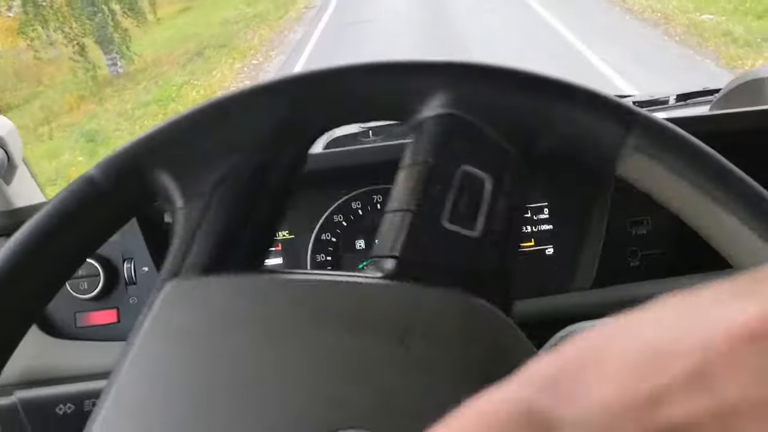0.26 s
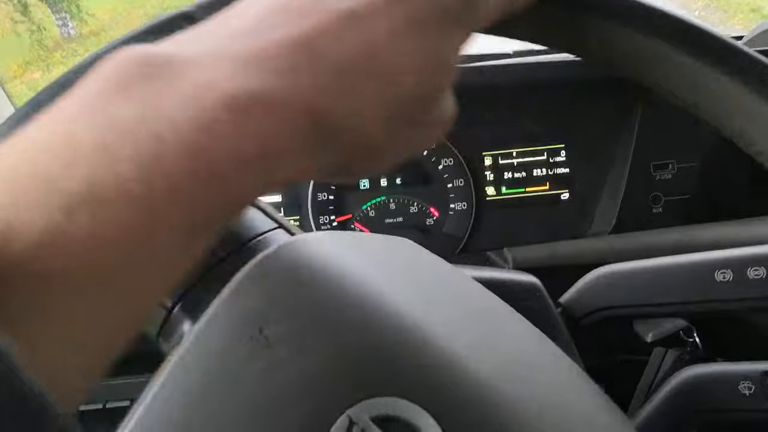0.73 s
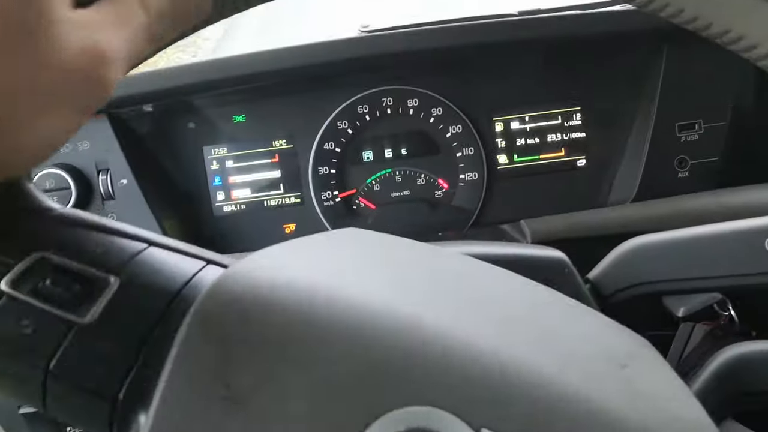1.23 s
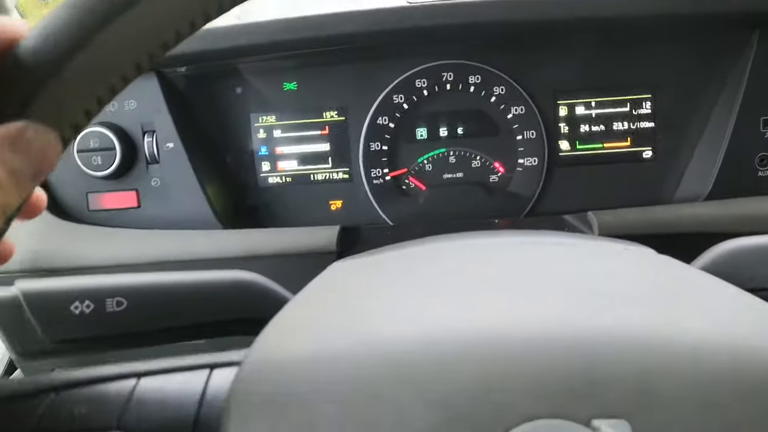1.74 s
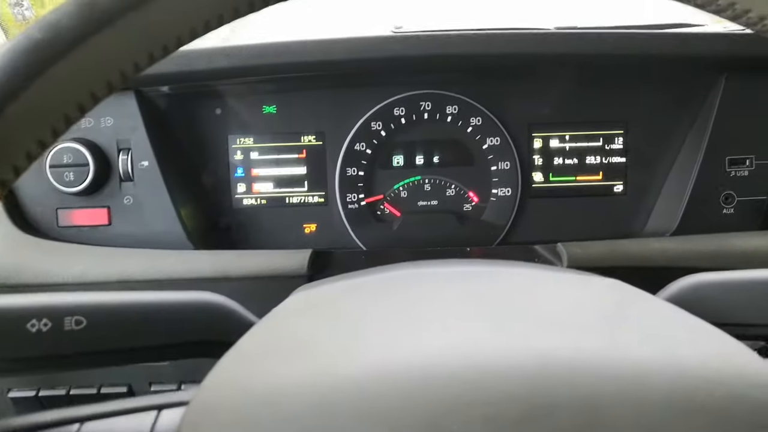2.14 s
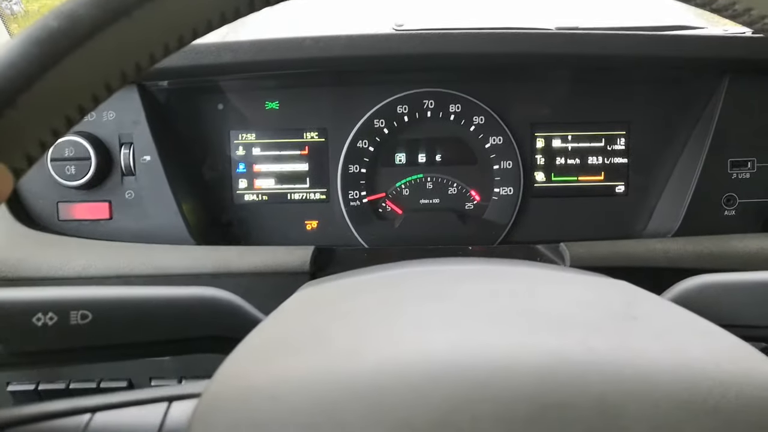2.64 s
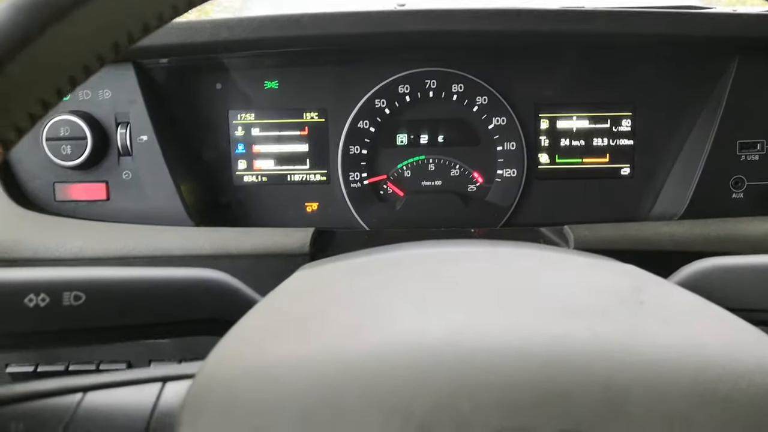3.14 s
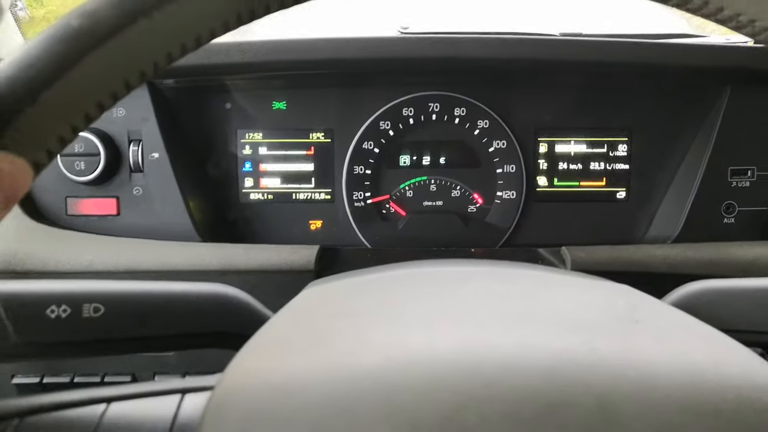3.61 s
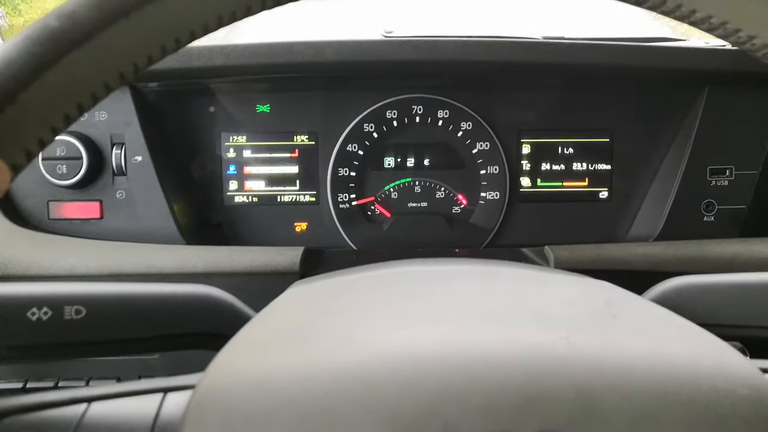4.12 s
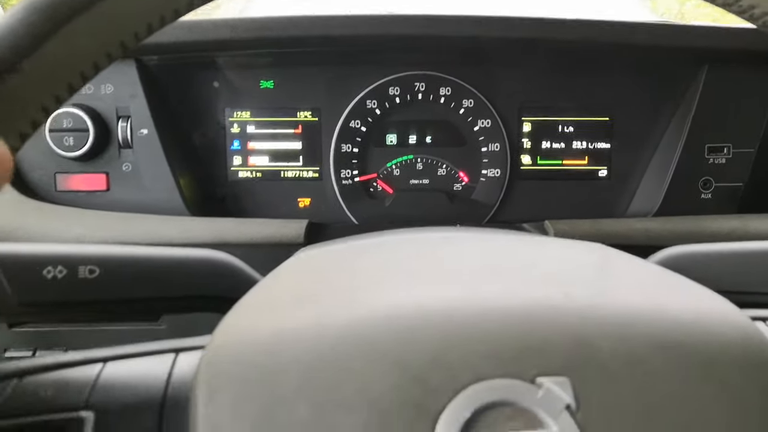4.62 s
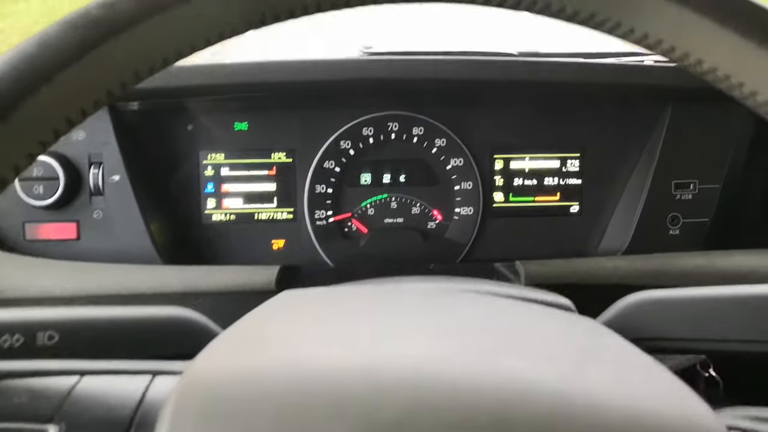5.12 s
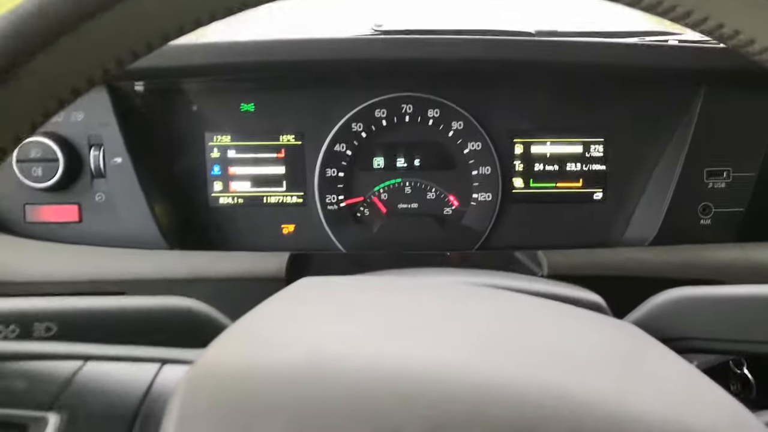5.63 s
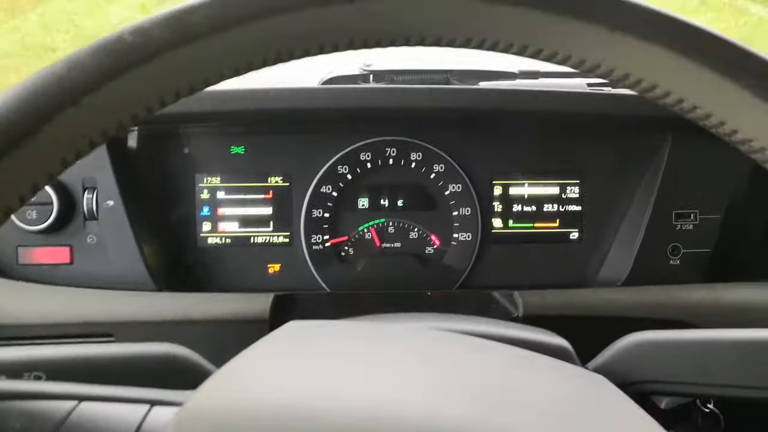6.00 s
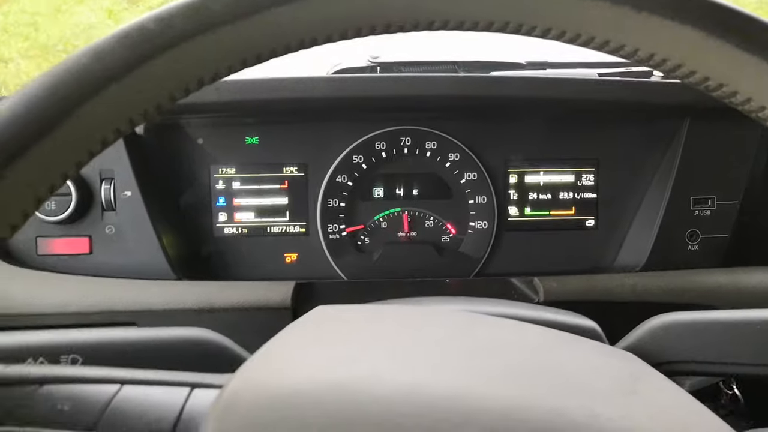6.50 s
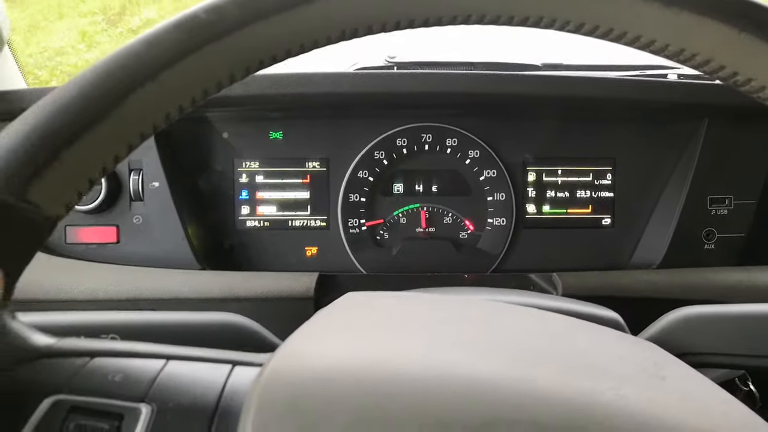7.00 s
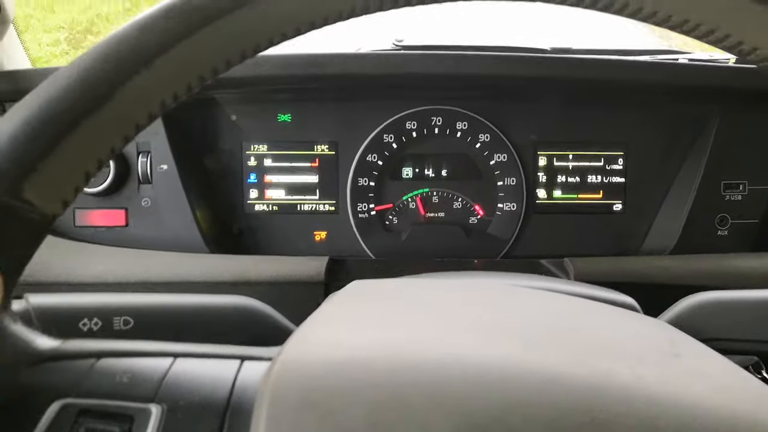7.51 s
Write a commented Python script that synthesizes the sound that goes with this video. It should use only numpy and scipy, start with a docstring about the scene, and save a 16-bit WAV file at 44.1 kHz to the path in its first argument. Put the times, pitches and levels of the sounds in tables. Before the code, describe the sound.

Heard from the driver's seat inside a heavy truck, a diesel engine rumbles at idle with a light clatter. Hands slide faintly over the steering wheel and the cab gives one soft thump. After about five seconds the engine revs up and grows much louder, booming and briefly rattling the trim. A short pop comes at the gear change, the revs drop, and the engine pulls again.

```python
"""A six-cylinder diesel heard inside a heavy truck's cab: it rolls at idle, pulls hard, shifts up, pulls again.
Firing pulses boom and engine orders sweep through the cab's air modes; combustion clatters behind the
bulkhead, gears whine, the intake roars and a metal cover rings at idle. The cab judders and thumps once,
loose trim rattles, hands slide and catch on the wheel, and a pressure pop snaps at the gear change."""
import sys
import numpy as np
from scipy import signal
from scipy.fft import rfft, irfft
from scipy.io import wavfile

SR = 44100
rng = np.random.default_rng(int(sys.argv[2]) if len(sys.argv) > 2 else 0)


def digitize_waveform(pressure):
    """Quantize a signal to 16-bit integers and store it at the path in sys.argv[1].

    Rows of a 2-D input are taken as channels; values are limited to [-1, 1].
    """
    field = np.atleast_2d(pressure).T
    bounded = np.clip(field, -1, 1)
    quanta = np.round(bounded * 32767).astype(np.int16)
    wavfile.write(sys.argv[1], SR, quanta)


N = 341775
T = np.arange(N) / SR
HZ = np.maximum(np.arange(N // 2 + 1) * SR / N, 1)


def undb(db):
    """Decibels to gain."""
    return 10 ** (np.asarray(db) / 20)


def curves(rows):
    """Columns after the first, interpolated linearly over time."""
    times_s, *columns = np.transpose(rows)
    return [np.interp(T, times_s, column) for column in columns]


def unit(x):
    """Scale to rms 1."""
    return x / np.sqrt(np.mean(x ** 2))


def bell(hz, centre_hz, width_hz):
    """Resonance curve: peak 1, full width at half height."""
    return 1 / (1 + (2 * (hz - centre_hz) / width_hz) ** 2)


def response(outline, modes=()):
    """Gain per frequency: (Hz, dB) outline plus (Hz, width Hz, dB) resonances."""
    hz, db = np.transpose(outline)
    outline_db = np.interp(np.log(HZ), np.log(hz), db)
    return undb(outline_db + sum(peak_db * bell(HZ, f, width) for f, width, peak_db in modes))


def shape(x, gain):
    """Filter by a gain per frequency."""
    return irfft(rfft(x) * gain, N)


def walk(rate_hz):
    """Smooth random wander, spread near 1."""
    steps = rng.standard_normal(8192)
    return 1.29 * np.interp(T * rate_hz, np.arange(len(steps)), steps)


def pan(db):
    """Stereo gains for a left minus right level."""
    return undb(np.array([[db], [-db]]) / 2)


def swell(t, rise_s, fall_s):
    """Two-sided Gaussian envelope, peak at t = 0."""
    return np.exp(-(t / np.where(t < 0, rise_s, fall_s)) ** 2)


def cab_noise(split_hz=480):
    """Diffuse stereo noise: channels alike for long waves, unrelated for short ones."""
    mid, side = rng.standard_normal((2, N))
    side_power = .5 / (1 + (split_hz / HZ) ** 4)
    return shape(mid, np.sqrt(1 - side_power)) + shape(side, np.sqrt(side_power)) * np.array([[1], [-1]])


def knocks(cycles, decay_cycles, scatter_db):
    """One decaying burst per cycle, strength scattered by scatter_db."""
    strength = undb(scatter_db * rng.standard_normal(4096))
    return strength[cycles.astype(int)] * np.exp(-(cycles % 1) / decay_cycles)


def boom(firings, waver_db=1.26):
    """Firing pulses shake the whole cab at their fundamental."""
    return np.sin(2 * np.pi * firings + .15 * walk(14)) * undb(waver_db * walk(12))


def rumble(firings, firing_hz, pull):
    """Engine orders and rough shaking pass through the cab, swelling as they cross its air modes."""
    # Each row: cycles per two crank turns, relative dB at idle, relative dB pulling.
    orders = [(8, -12, -6.5), (9, -1, -4), (12, -7, -1), (15, -11.5, -10), (16, -18.5, -6.5),
              (18, -13, -4.5), (21, -21.5, -2), (24, -9, -7), (27, -27, -11), (29, -0.45, -11),
              (34, -10.5, -12), (36, -12.5, -5), (38, -7, -13), (42, 5.5, -7), (47, -9, -8.5),
              (60, -9, -10)]
    # Each row: frequency in Hz, wall transmission in dB.
    walls = [(15, -33), (25, -2.5), (45, -12), (62, -1.5), (80, -1), (115, -8), (132, -11.5), (165, -9.5),
             (188, -10), (240, -11), (300, -14.5), (385, -17), (460, -26), (700, -50), (1500, -63)]
    # Each row: frequency in Hz, width in Hz, peak in dB.
    air_modes = [(95, 35, 1), (150.3, 25, 4), (209.7, 12, 2.5), (251.7, 24.5, 3.5), (372, 34, 3.5)]
    cab = response(walls, air_modes)
    cycles = firings / 6
    jitter_rad, waver_db = .053 + .04 * pull, .64 + 1.3 * pull
    tones = 0
    for order, idle_db, pull_db in orders:
        phase = 2 * np.pi * (order * cycles + rng.random()) + jitter_rad * walk(21)
        db = idle_db + (pull_db - idle_db) * pull + waver_db * walk(9)
        tones = tones + np.sqrt(2) * np.sin(phase) * undb(db)
    shaking = cab_noise() * (.29 + knocks(firings, decay_cycles=.12, scatter_db=0))
    rough_db = -.9 - 1.4 * pull - .16 * np.maximum(firing_hz - 62, 0)  # smoother at speed
    return shape(tones, cab) + undb(rough_db) * unit(shape(shaking, cab))


def clatter(firings, pull, direct_db=-5, lag_s=.000563):
    """Combustion knock and valve ticks ring the block; pulling favours other panels than idling."""
    # Each row: frequency in Hz, combustion noise through the bulkhead in dB.
    bulkhead = [(250, 4), (450, 1.5), (620, 3.5), (1100, 2), (2000, -3), (2550, -2.5), (2830, -6.5),
                (3100, -13), (4200, -19), (5600, -20.5), (6300, -23), (7500, -24.5), (8400, -32),
                (10000, -36), (15000, -56)]
    # Each row: panel frequency in Hz, width in Hz, peak at idle in dB, peak pulling in dB.
    block_modes = [(477, 47, 1.5, 4.5), (594, 26, 4, 4.5), (672, 60, 2, 2), (795, 230, -0.5, 3),
                   (980, 95, 1.5, 3.5), (1282, 60, 3, 5.5), (1520, 70, -2.5, 2), (1607, 38, 1, 5),
                   (1650, 90, 4, 6.5), (1936, 215, 4.5, 4.5), (2170, 70, 1, 2.5), (2400, 500, -.5, 2),
                   (3900, 800, 0, -1.5)]
    combustion = (.25 + .35 * pull) * knocks(firings, decay_cycles=.22, scatter_db=1.8)
    valves = (.14 + .14 * pull) * knocks(4 * firings + .3, decay_cycles=.3, scatter_db=4)
    # Engine cover on the right: the left gets its direct sound later, with less treble.
    right = rng.standard_normal(N)
    left = shape(right, np.exp(-2j * np.pi * HZ * lag_s))
    noise = cab_noise() + undb(direct_db) * np.array([left, right])
    pan_db = np.interp(np.log(HZ), np.log([700, 1300, 2400, 4400, 12000]), [3, -2.5, -5, -2, -5.5])
    strikes = shape(noise * (1 + combustion + valves), undb(np.array([pan_db, -pan_db]) / 2))
    idling = shape(strikes, response(bulkhead, [(hz, width, db) for hz, width, db, _ in block_modes]))
    pulling = shape(strikes, response(bulkhead, [(hz, width, db) for hz, width, _, db in block_modes]))
    return unit(idling + (pulling - idling) * pull) * undb(6.5 + walk(45))


def gear_whine(firings, firing_hz):
    """Teeth mesh in step with the firings; tones swell at resonances and flicker with uneven turning."""
    # Each row: meshes per firing, relative dB, sway in rad, housing resonances (Hz, width Hz, dB).
    gears = [ (42, -1, .4, [(2320, 40, -3), (2435, 55, 2), (2560, 140, -.5)]),
             (31.5, -7.5, .5, [(2430, 120, 0)]), ]
    out = 0
    for teeth, db, sway_rad, resonances in gears:
        mesh = 2 * np.pi * teeth * firings + sway_rad * np.sin(2 * np.pi * firings)
        housing = sum(undb(peak) * bell(teeth * firing_hz, f, width) for f, width, peak in resonances)
        channels = [np.sin(mesh + .62 * walk(110)) * undb(3.2 * walk(32)) for _ in range(2)]
        out = out + np.array(channels) * housing * undb(db)
    return out * pan(-.77)


def loads(release_s=.095):
    """Spells of load rise, hold and let go; returns boom gain and extra dB of rumble and clatter."""
    # Light throttle, torque jolt, hard pull, engine brake, next gear taking up, second pull.
    # Each row: start in s, end in s, rise in s, boom in dB, extra rumble in dB, extra clatter in dB.
    spells = [ (4.396, 5.1, 0.09, -34, 2, 2.5), (5.043, 5.066, .04, -53, -0.5, 3),
              (5.207, 6.536, 0.15, -30.5, 4.5, 6.3), (6.623, 6.797, 0.099, -26.5, -1, 4),
              (6.82, 7.184, 0.037, -52, 1.5, 1), (7.087, 7.9, 0.42, -34, 4.7, 4.5), ]
    boom_gain = rumble_db = clatter_db = 0
    for start_s, end_s, rise_s, boom_db, extra_rumble_db, extra_clatter_db in spells:
        load = np.clip((T - start_s) / rise_s, 0, 1) * np.clip(1 - (T - end_s) / release_s, 0, 1)
        boom_gain = boom_gain + load * undb(boom_db)
        rumble_db = rumble_db + load * extra_rumble_db
        clatter_db = clatter_db + load * extra_clatter_db
    return boom_gain, rumble_db, clatter_db


def surge(period_s=.469, crest_s=2.23):
    """Slow, slightly uneven swing of the idle fuelling as the governor hunts."""
    return np.cos(2 * np.pi * (T - crest_s) / period_s) + .2 * walk(6.5)


def intake(firings, peak_s=5.69, half_s=.3, level_db=-47):
    """The intake roars, pulsing with the cylinders, as the throttle first opens wide."""
    gulps = cab_noise() * (.48 + knocks(firings, decay_cycles=.33, scatter_db=5))
    duct = bell(HZ, centre_hz=375, width_hz=170)
    return unit(shape(gulps, duct)) * undb(level_db) * swell(T - peak_s, half_s, half_s)


def judders():
    """Brief low booms and drones swell in the cab, at idle and under load."""
    # Each row: peak time in s, half length in s, frequency in Hz, level in dB.
    swells = [(.3, .08, 26.96, -35), (.88, 0.056, 76, -42.5), (5.076, 0.027, 92.2, -34.5),
              (5.458, 0.019, 90.1, -29), (5.541, 0.036, 101, -26.5), (5.566, 0.041, 74.96, -30),
              (5.738, 0.032, 85.3, -29.5), (6.034, 0.047, 107.6, -41), (6.25, .08, 75, -36),
              (6.49, 0.087, 207.9, -40), (7.27, .17, 143.6, -41), (7.355, 0.21, 214.6, -43),
              (7.69, .09, 62.9, -32.5)]
    sway_rad = .48 * walk(25)
    out = 0
    for peak_s, half_s, hz, db in swells:
        tone = np.sqrt(2) * np.sin(2 * np.pi * (hz * T + rng.random()) + sway_rad)
        out = out + tone * undb(db) * swell(T - peak_s, half_s, half_s)
    return out


def thump(start_s=3.215, push_s=.0056, ring_db=-28, scuff_db=-48):
    """A soft blow rings the cab's panels, with a dull scuff around it."""
    # Each row: frequency in Hz, relative level in dB, T60 in s.
    panel_modes = [(167.8, 2, 0.24), (291.4, -6, 0.18), (450, -14.5, 0.12), (521, -23, 0.15),
                   (655, -18, 0.096)]
    t = np.maximum(T - start_s, 0)
    ring = sum(undb(db - 60 * t / t60_s) * np.sin(2 * np.pi * (hz * t + rng.random()))
               for hz, db, t60_s in panel_modes)
    push = 1 - np.exp(-t / push_s)
    colour = response([(100, -24), (200, 0), (500, -.5), (800, -8), (1500, -11), (2500, -19),
                       (5000, -37), (12000, -75)])
    scuff = unit(shape(cab_noise(), colour)) * swell(T - start_s - .015, rise_s=.045, fall_s=.079)
    return ring * push * undb(ring_db) + scuff * undb(scuff_db)


def pop(start_s=6.5911, snap_s=.00011, leak_s=.0041, muffle_hz=260, lag_s=.00046):
    """A pressure step snaps on the left and leaks away; the right gets it later and rounded."""
    t = np.maximum(T - start_s, 0)
    pressure = (t > 0) * (.87 * np.exp(-t / snap_s) + .5 * np.exp(-t / leak_s))
    left = signal.sosfilt(signal.butter(2, 4300, fs=SR, output="sos"), pressure)
    left = .9 * left / left.max()
    right = shape(left, np.exp(-2j * np.pi * HZ * lag_s) / (1 + 1j * HZ / muffle_hz))
    return signal.sosfilt(signal.butter(1, 20, "high", fs=SR, output="sos"), np.array([left, right]))


def rattles(attack_s=.002, chatter_db=3):
    """Loose trim buzzes briefly as the pull shakes the dash."""
    # Each row: start in s, decay in s, level in dB.
    bursts = [(5.562, 0.056, -49), (5.683, .012, -48), (5.831, 0.022, -43.5)]
    # Each row: frequency in Hz, width in Hz, peak in dB.
    trim_modes = [(1760, 130, -2), (2150, 220, -2), (2460, 160, 1), (2800, 170, -1)]
    ring = sum(undb(db) * bell(HZ, hz, width_hz) for hz, width_hz, db in trim_modes)
    buzz = unit(shape(rng.standard_normal((2, N)) * undb(chatter_db * walk(300)), ring))
    envelope = 0
    for start_s, decay_s, db in bursts:
        t = np.maximum(T - start_s, 0)
        envelope = envelope + np.minimum(t / attack_s, 1) * np.exp(-t / decay_s) * undb(db)
    return buzz * envelope


def grips(attack_s=.0027):
    """Fingers land on the wheel and let go; some contacts ring its plastic, others are a dull scrape."""
    # Each row: start in s, hold in s, decay in s, level in dB, ring share 0-1, left minus right in dB.
    contacts = [ (1.418, 0.0022, 0.0048, -57, .2, -1.5), (1.741, 0.016, 0.017, -50, 1, -5),
                (1.775, .009, 0.016, -56.5, 0.7, -4), (1.834, .001, .002, -64, .5, -1.5),
                (4.651, 0.0037, .002, -49, .5, -7), (5.562, .004, .002, -55, .3, -5),
                (5.577, .008, .006, -53, 0.4, -7), (5.629, .009, 0.0065, -41.5, 0, -1), ]
    # Each row: frequency in Hz, contact noise in dB.
    colour = [(700, -12), (2000, 8), (3000, 2), (5600, -1.5), (7600, 0), (8600, -9.5), (11000, -13),
              (12500, -27), (15000, -27)]
    # Each row: frequency in Hz, width in Hz, peak in dB.
    wheel_modes = [(3760, 380, 7), (4850, 460, 12), (7440, 560, 12), (9400, 750, 12)]
    out = np.zeros((2, N))
    friction = rng.standard_normal((2, N))
    dull = unit(shape(friction, response(colour)))
    ringing = unit(shape(friction, response(colour, wheel_modes)))
    for start_s, hold_s, decay_s, db, ring, pan_db in contacts:
        span = slice(int(start_s * SR), int(start_s * SR) + SR // 10)
        t = T[span] - start_s
        envelope = np.clip(t / attack_s, 0, 1) * np.exp(-np.maximum(t - hold_s, 0) / decay_s)
        scrape = (1 - ring) * dull[:, span] + ring * ringing[:, span]
        out[:, span] += scrape * envelope * undb(db) * pan(pan_db)
    return out


def slides(window_samples=2 ** 16):
    """Palms and sleeves rub over the rim: swells of fine-grained hiss."""
    # Each row: peak time, rise and fall in s, level in dB, centre in Hz, half width in octaves,
    # left minus right in dB.
    strokes = [ (.17, 0.11, 0.08, -67, 4870, 0.32, -15), (.42, 0.33, 0.27, -71, 5400, 0.48, -3),
               (1.06, .04, .036, -72, 8450, .97, 0), (1.22, 0.037, 0.022, -66.5, 7840, 0.51, -5),
               (1.333, 0.064, 0.06, -59.5, 8700, 0.87, 0), (1.345, .05, .06, -61.5, 1600, .6, 0),
               (1.714, 0.042, 0.024, -66.5, 6940, 0.96, -4), (3.015, .01, .015, -68, 5500, .7, -1),
               (3.19, .02, 0.022, -59, 5930, 0.13, -5), (4.62, 0.13, 0.088, -68.5, 6940, 0.61, -6),
               (4.69, 0.032, 0.03, -60, 8600, 0.64, 1), (4.84, .047, 0.057, -74, 10600, 0.21, 19),
               (4.9, 0.072, .068, -59.5, 6700, 1, -3), (5.595, 0.013, 0.035, -60, 5160, .46, -10),
               (5.645, 0.018, 0.042, -55, 5400, 0.79, -4), (6.83, .06, .06, -75, 5400, .04, 0),
               (7.21, .03, .025, -74, 5800, .04, 0), ]
    # Each row: frequency in Hz, rubbing noise in dB.
    colour = [(1000, -5), (3000, 6.5), (5600, 5), (6400, 2), (8500, -3), (10500, 0.5), (12000, -9),
              (15000, -7)]
    # Each row: frequency in Hz, width in Hz, peak in dB.
    rub_modes = [(3540, 230, 6.9), (4810, 520, 1.4), (7500, 1100, 8.1), (9500, 920, 4.6)]
    out = np.zeros((2, N))
    hz = np.maximum(np.arange(window_samples // 2 + 1) * SR / window_samples, 1)
    grain = shape(rng.standard_normal((2, N)) * undb(1.65 * walk(450)), response(colour, rub_modes))
    for peak_s, rise_s, fall_s, db, centre_hz, octaves, pan_db in strokes:
        start = np.clip(int(peak_s * SR) - window_samples // 2, 0, N - window_samples)
        span = slice(start, start + window_samples)
        band = 1 / (1 + (np.log2(hz / centre_hz) / octaves) ** 2)
        hiss = unit(irfft(rfft(grain[:, span]) * band))
        out[:, span] += hiss * swell(T[span] - peak_s, rise_s, fall_s) * undb(db) * pan(pan_db)
    return out


def cover(firings, jitter_s=.001, scatter_db=4, pan_db=-2):
    """Each firing taps a thin metal cover, slightly early or late; it rings on until the next."""
    # Each row: frequency in Hz, width in Hz.
    cover_modes = [(1892, 11), (1951, 20)]
    # Each row: time in s, level in dB.
    levels = [(0, -77), (1.1, -76), (1.35, -67), (3, -66.5), (3.6, -71), (4.1, -66.5), (4.5, -64),
              (4.95, -69), (5.3, -90)]
    hits = np.flatnonzero(np.diff(np.floor(firings)))
    timing, strength = rng.standard_normal((len(hits), 2)).T
    hits = np.clip(hits + (timing * SR * jitter_s).astype(int), 0, N - 1)
    taps = np.zeros(N)
    taps[hits] = undb(scatter_db * strength)
    ring = sum(1 / (1 + 2j * (HZ - hz) / width_hz) for hz, width_hz in cover_modes)
    db, = curves(levels)
    return unit(shape(taps, ring)) * undb(db) * pan(pan_db)


def squeak(pan_db=-6):
    """A palm drags on the rim with a faint, hissy squeak."""
    # Each row: time in s, pitch in Hz, gain in dB.
    glide = [(5.09, 6250, -82), (5.16, 7050, -74), (5.2, 6800, -75), (5.24, 7120, -72), (5.28, 6650, -70),
             (5.3, 6500, -87)]
    hz, db = curves(glide)
    phase = 2 * np.pi * np.cumsum(hz * (1 + .014 * walk(1000))) / SR
    tone = .6 * np.sin(phase) * undb(2.5 * walk(120))
    hiss = .42 * (walk(900) * np.sin(phase) + walk(900) * np.cos(phase))
    gate = (T > glide[0][0]) & (T < glide[-1][0])
    return (tone + hiss) * undb(db) * pan(pan_db) * gate


def air(level_db=-80):
    """Faint, even hiss in the cab."""
    colour = response([(500, -26), (3000, -6), (7500, 5), (8400, .5), (9700, 3), (11500, 2.5),
                       (15000, -2.5)])
    return unit(shape(rng.standard_normal((2, N)), colour)) * undb(level_db)


def scene(idle_hz=30):
    """Speed and load drive the engine layers; small cab sounds lie on top."""
    # Each row: time in s, firing rate in Hz.
    speed = [(0, 30.03), (2.9, 30.03), (3.02, 29.7), (4, 29.7), (4.16, 30.05), (4.33, 30.05), (4.47, 30.7),
             (4.9, 30.7), (5.2, 31.5), (5.37, 44.3), (5.5, 51), (5.7, 58.8), (5.83, 63.2), (6, 70.5),
             (6.2, 75.6), (6.56, 79.2), (6.89, 62.6), (7.04, 58.9), (7.1, 57.8), (7.2, 55.2), (7.45, 54.8),
             (7.53, 57.3), (7.75, 64.2)]
    firing_hz, = curves(speed)
    firings = np.cumsum(firing_hz) / SR
    octaves = np.log2(firing_hz / idle_hz)
    pull = np.clip((firing_hz - 32) / 16, 0, 1)  # 0 at idle, 1 at raised revs
    swing = surge() * (1 - pull)
    load_boom, load_rumble_db, load_clatter_db = loads()
    # Near top revs the boom cancels at the driver's seat.
    node = undb(-10 * bell(firing_hz, centre_hz=78.9, width_hz=2.1))
    idle_boom = (1 - pull) * undb(-39 + 2 * swing)
    boom_gain = np.hypot(idle_boom, load_boom) * node
    rumble_db = -46 + 6 * octaves + .33 * swing + load_rumble_db
    clatter_db = -60 + 2 * octaves + .27 * swing + load_clatter_db
    low = boom(firings) * boom_gain + rumble(firings, firing_hz, pull) * undb(rumble_db)
    high = (clatter(firings, pull) + gear_whine(firings, firing_hz)) * undb(clatter_db)
    engine = low + high + cover(firings) + intake(firings)
    return engine + judders() + rattles() + slides() + grips() + squeak() + thump() + pop() + air()


def record(dry):
    """Steep low-pass at 15.7 kHz."""
    return signal.sosfilt(signal.ellip(10, .1, 80, 15700, fs=SR, output="sos"), dry)


dry = scene()
out = record(dry)
digitize_waveform(out)
```